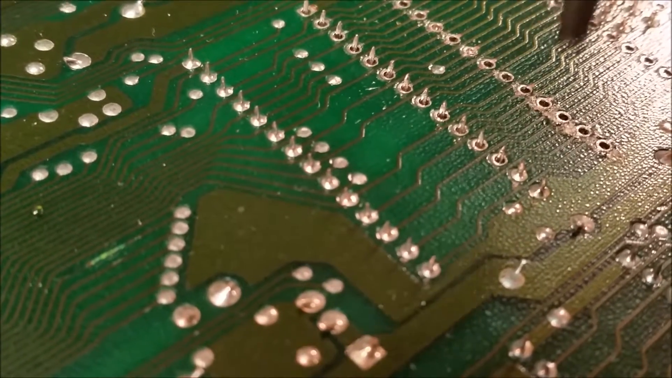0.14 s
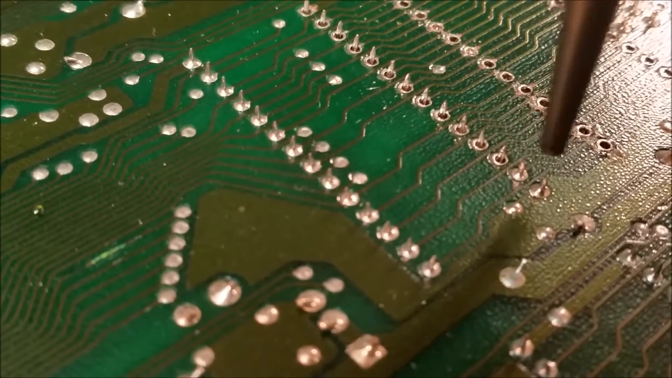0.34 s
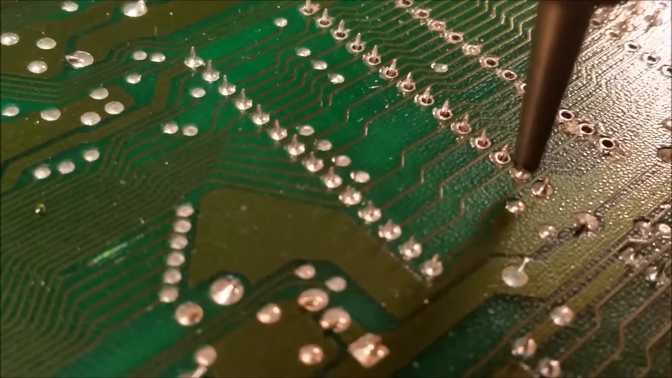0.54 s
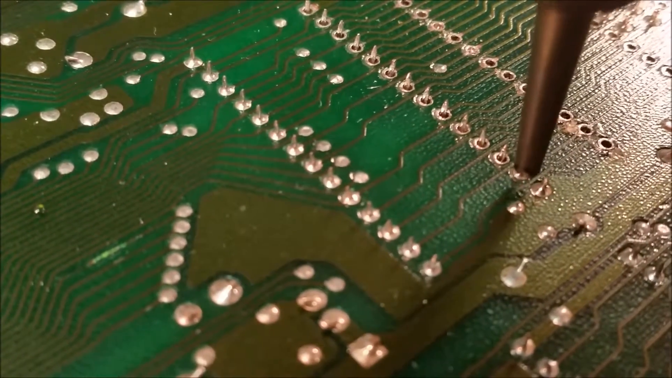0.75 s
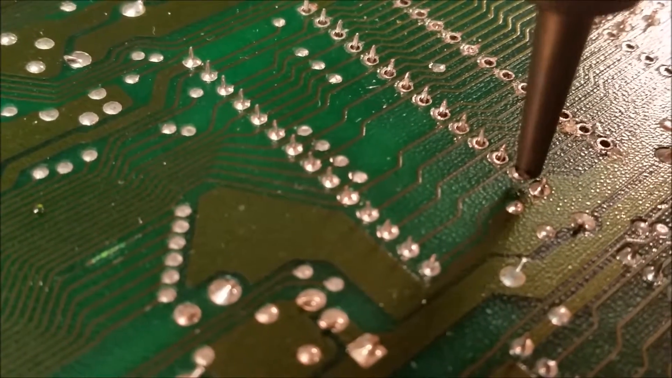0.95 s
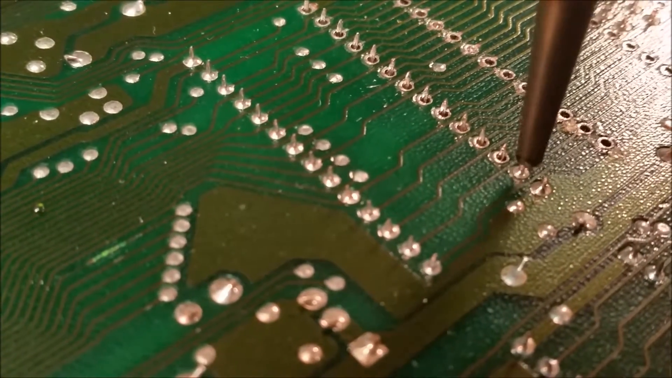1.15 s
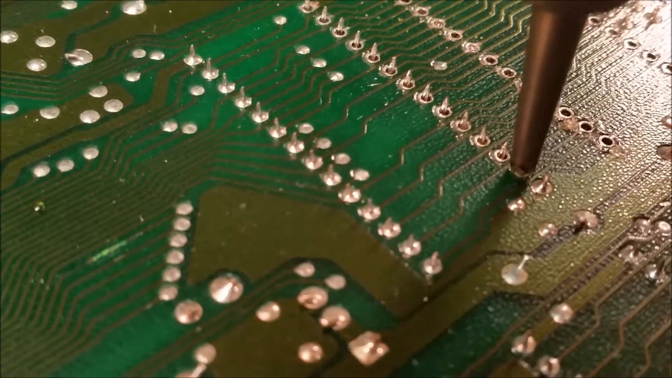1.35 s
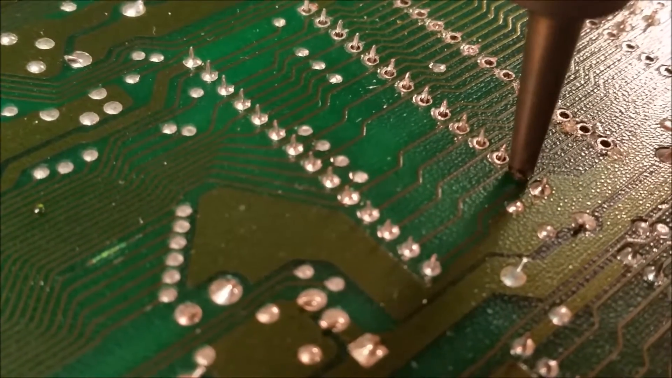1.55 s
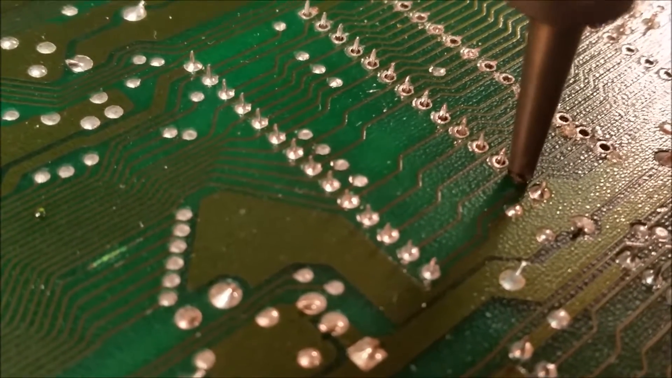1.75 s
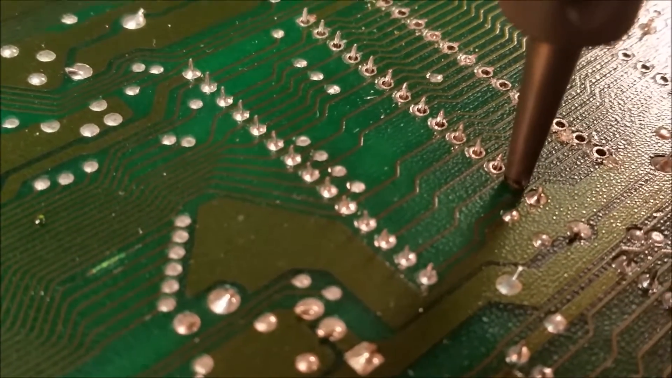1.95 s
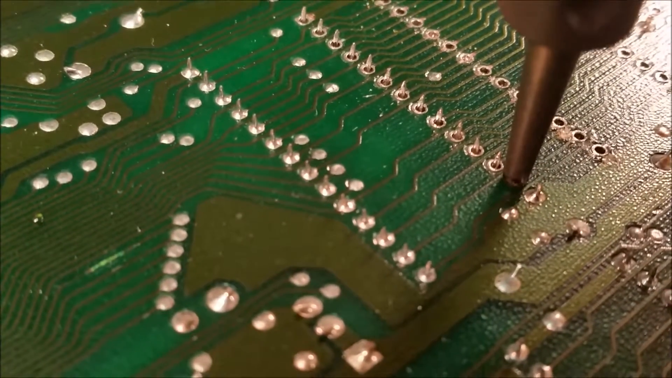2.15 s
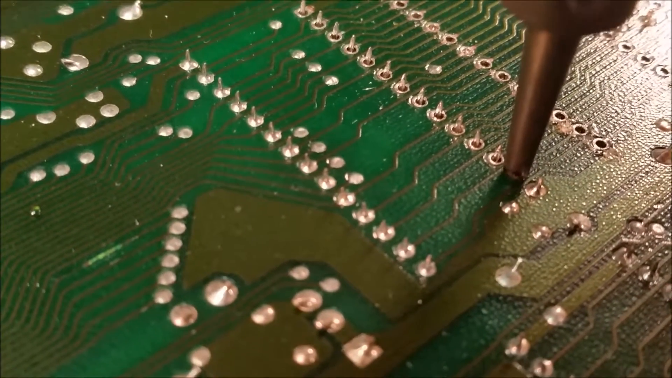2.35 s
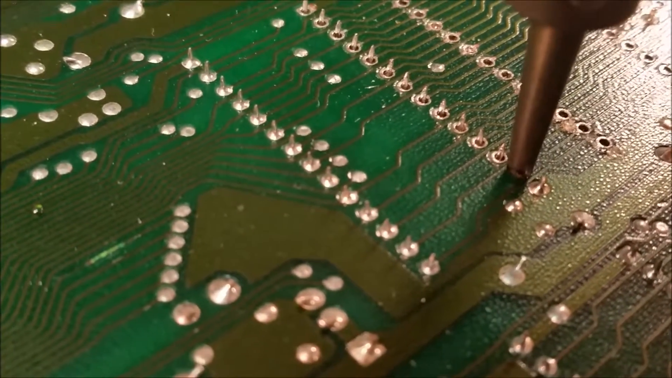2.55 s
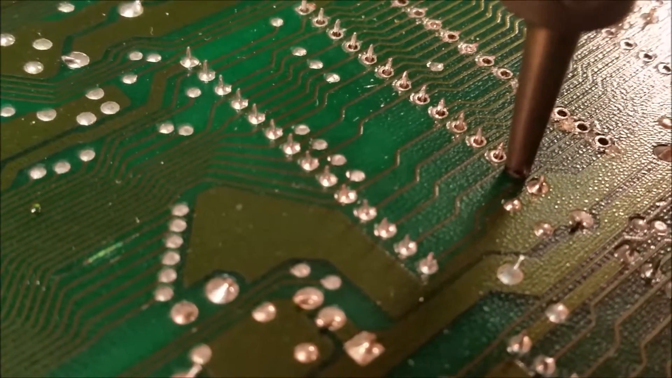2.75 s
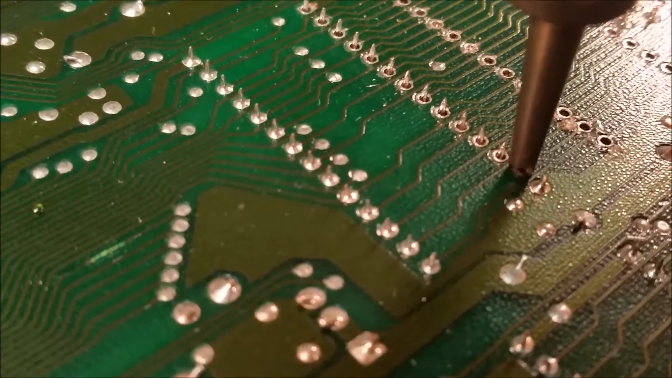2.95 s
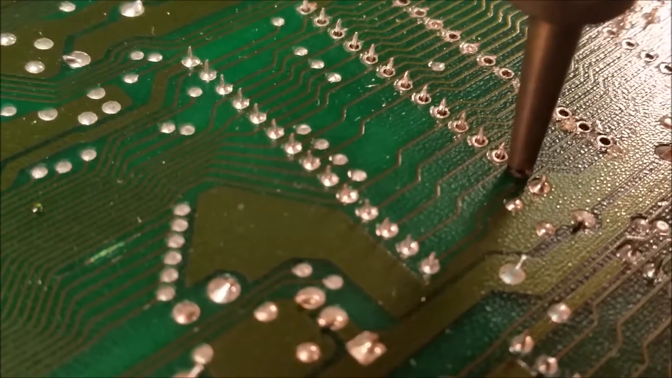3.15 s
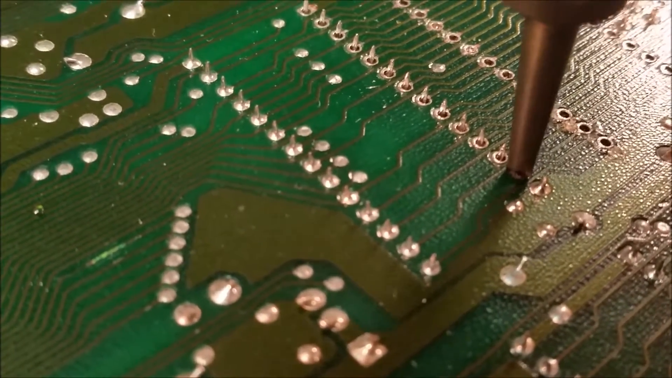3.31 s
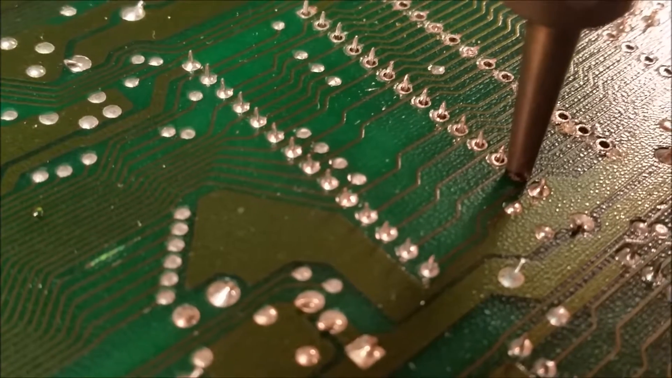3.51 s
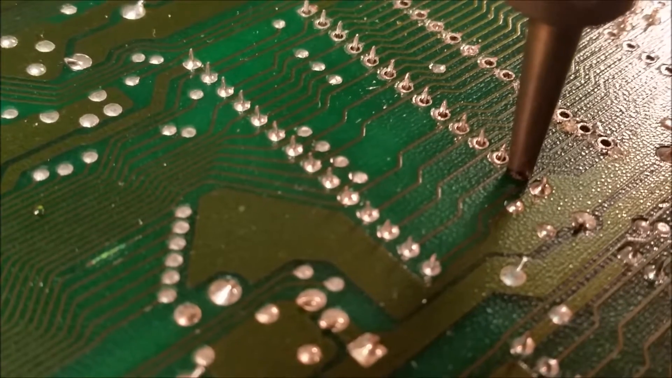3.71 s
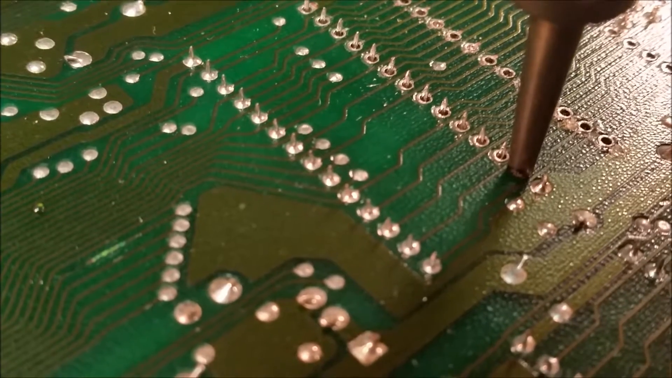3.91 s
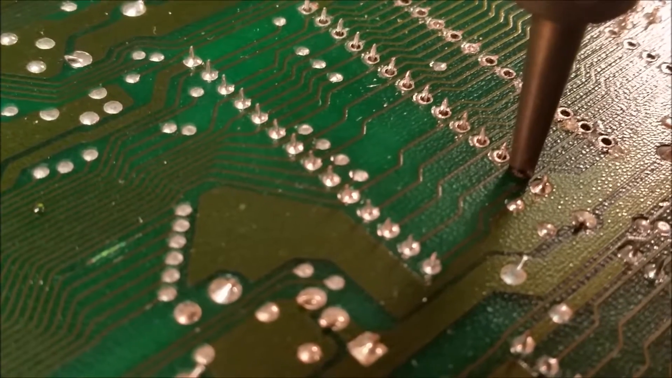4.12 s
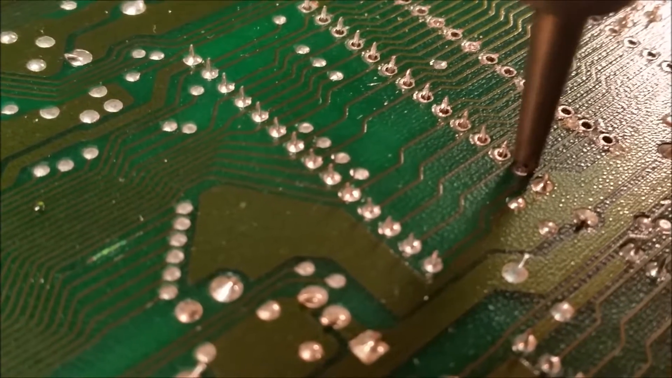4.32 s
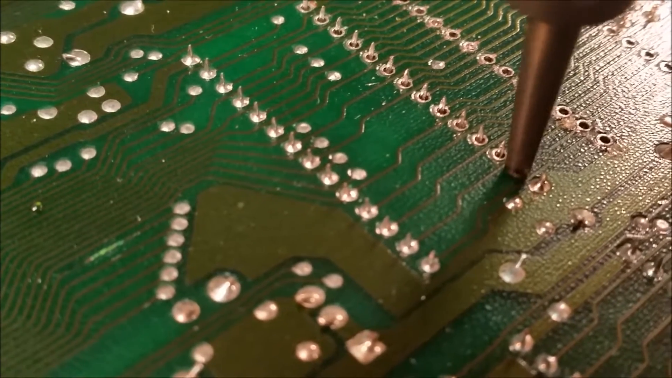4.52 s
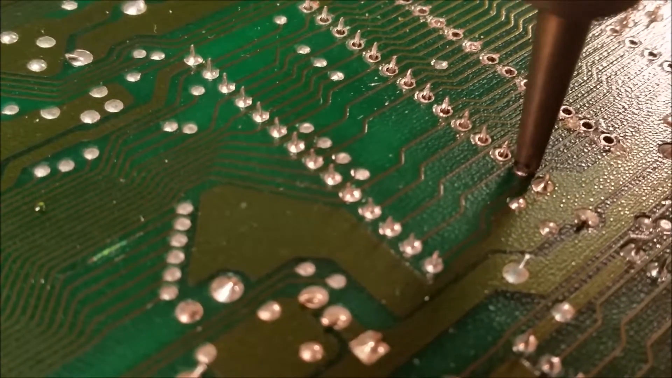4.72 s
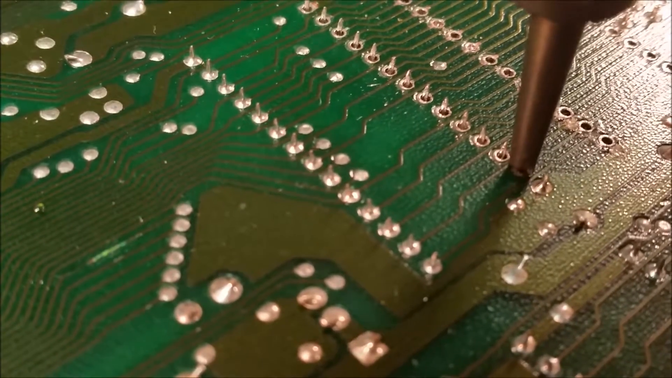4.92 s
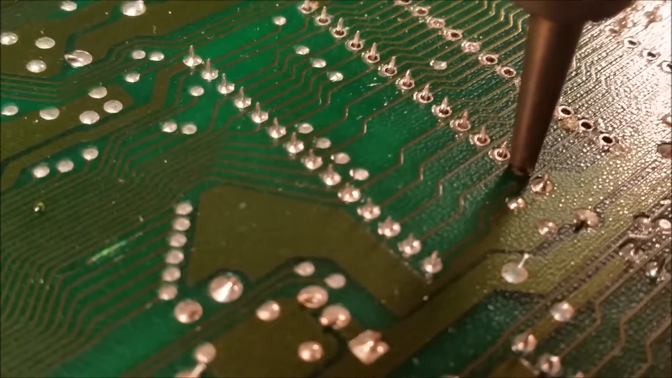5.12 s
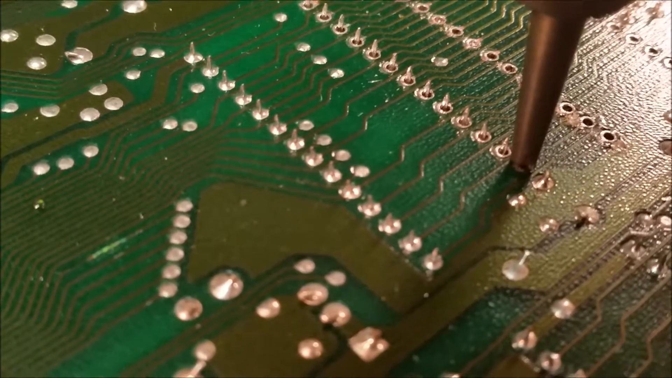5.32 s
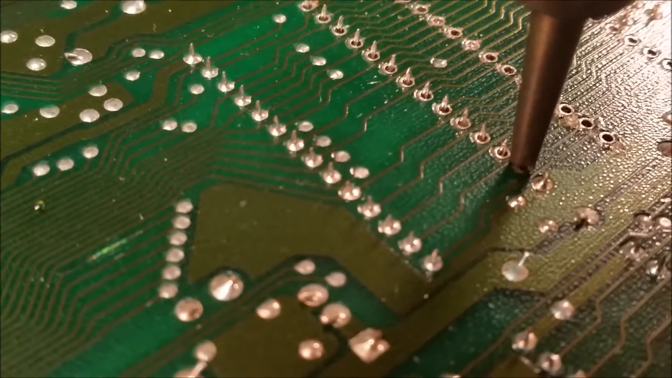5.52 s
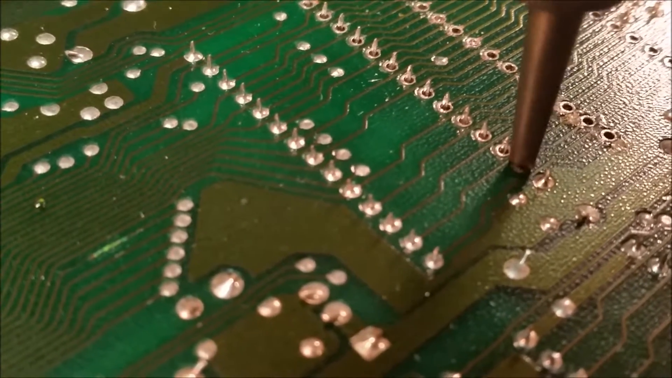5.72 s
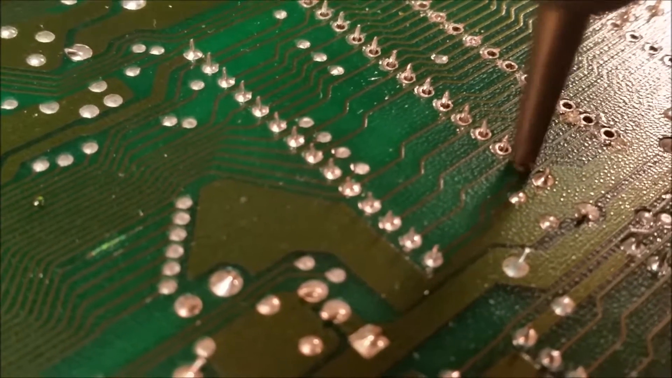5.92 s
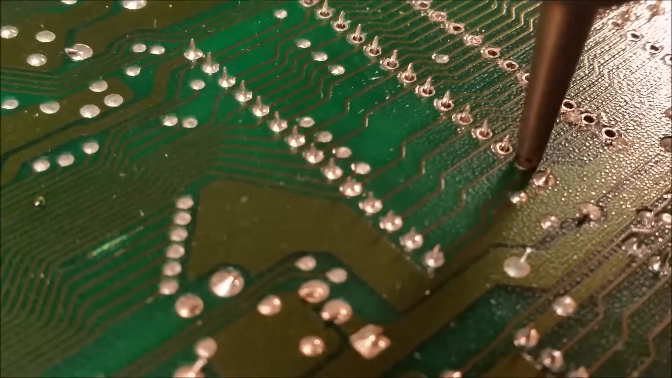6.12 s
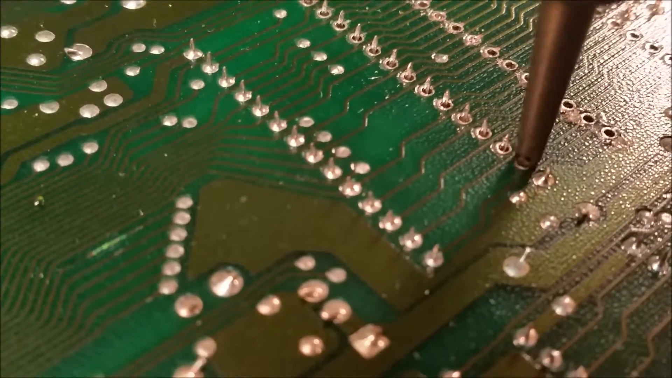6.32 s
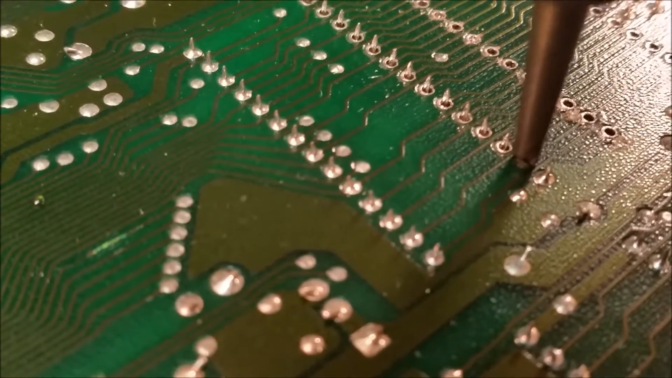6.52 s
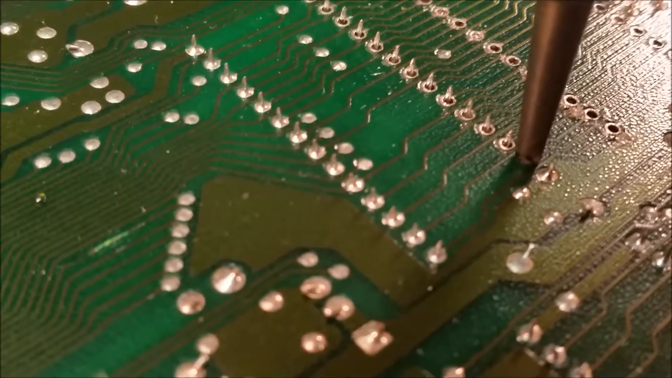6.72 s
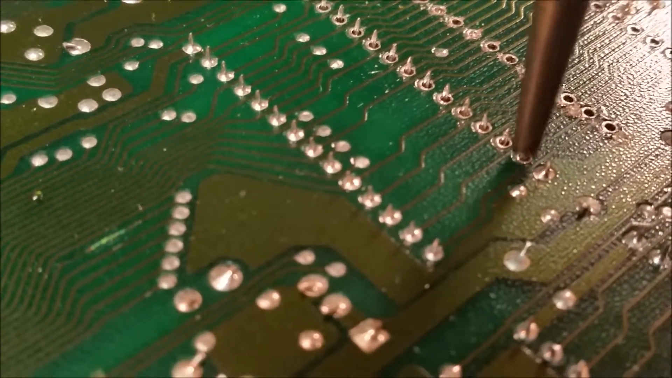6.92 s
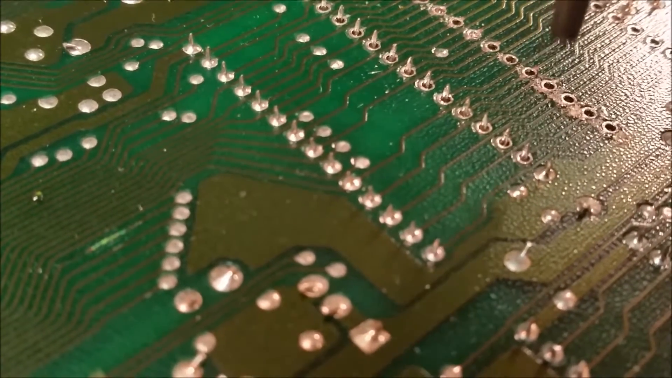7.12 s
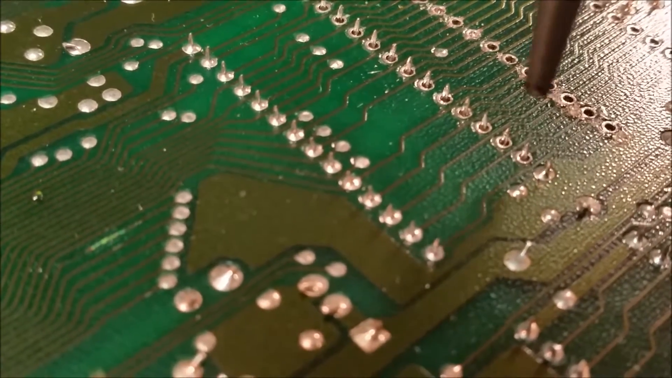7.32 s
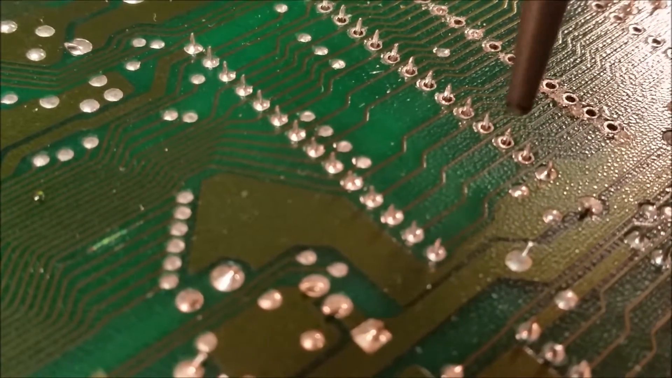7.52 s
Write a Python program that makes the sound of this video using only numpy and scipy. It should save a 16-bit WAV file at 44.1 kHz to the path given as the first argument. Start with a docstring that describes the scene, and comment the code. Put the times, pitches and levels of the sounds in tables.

```python
"""A vacuum desoldering gun works on a circuit board, close by in a humming workshop.
At first its pump and air hiss are running; a click comes and they die away, and the board shifts.
The hot nozzle then taps, chatters and scrapes on a pin, and flux crackles very faintly.
The trigger clicks, the pump starts with a deep throb and drones on; air hisses into the nozzle, spits
solder and whistles, amid more taps; the nozzle clicks off the pin and the pump and hiss die away again."""
import sys
import numpy as np
from scipy import signal
from scipy.fft import rfft, irfft, next_fast_len
from scipy.io import wavfile
from scipy.ndimage import map_coordinates

SR = 44100
rng = np.random.default_rng(int(sys.argv[2]) if len(sys.argv) > 2 else 0)


def persist_wave(psi):
    """Save psi, clipped to +-1, as 16-bit WAV."""
    counts = np.round(np.clip(psi, -1, 1) * 32767).astype(np.int16)
    wavfile.write(sys.argv[1], SR, np.atleast_2d(counts).T)


N = 337629  # length in samples


def amp(db):
    """Turn decibels into a gain."""
    return 10 ** (np.asarray(db) / 20)


def unit(x):
    """Scale a sound to an average (rms) level of 1."""
    return x / np.sqrt(np.mean(x ** 2) + 1e-20)


def along(points, hz):
    """Read a table of (pitch, value) points at any pitch, on a log pitch axis."""
    point_hz, value = np.transpose(points)
    return np.interp(np.log(hz + 1), np.log(point_hz + 1), value)


def curves(rows):
    """Join the table rows by straight lines: one curve for each column after the time."""
    s, *columns = np.transpose(rows)
    return [np.interp(np.arange(N) / SR, s, column) for column in columns]


def wobble(rate):
    """Draw a smooth random curve with rate random points a second."""
    points = rng.standard_normal(int(N * rate / SR) + 4)
    return map_coordinates(points, [np.arange(N) * rate / SR])


def phase_of(hz):
    """Add up a changing pitch into the running phase of its wave."""
    return 2 * np.pi * np.cumsum(hz) / SR


def filtered(x, response):
    """Multiply each pitch in a sound by a gain that depends on the pitch."""
    n = x.shape[-1]
    m = next_fast_len(n + 8192)  # silence at the end gives the filter room to ring
    return irfft(rfft(x, m) * response(np.fft.rfftfreq(m, 1 / SR)), m)[..., :n]


def noise(spectrum, size=N):
    """Colour random noise with a table of levels, then scale it to rms 1."""
    return unit(filtered(rng.standard_normal(size), lambda hz: amp(along(spectrum, hz))))


# how alike left and right are in sound from all round: pitch_hz, likeness (0 to 1)
LIKENESS = [(60, 1), (150, 0.96), (380, 0.98), (950, 0.1), (2380, 0.1), (5980, 0.25), (15000, 0.6)]


def diffuse(spectrum):
    """Make stereo noise from all round, as alike on both sides as the likeness table says."""
    def response(hz):
        turn = np.arccos(np.clip(along(LIKENESS, hz), 0, 1)) / 2
        return amp(along(spectrum, hz)) * [np.cos(turn), np.sin(turn)]

    mid, side = filtered(rng.standard_normal((2, N)), response)
    return unit(np.array([mid + side, mid - side]))


def pan(left_db):
    """Give the two channel gains for a source left_db louder on the left."""
    return amp([[left_db / 2], [-left_db / 2]])


def add(track, s, sound):
    """Mix a sound into the track at time s."""
    start = max(round(s * SR), 0)
    track[:, start:start + sound.shape[-1]] += sound[..., :N - start]


SAG_S = .04  # time constant of the pitch sag


def ring(modes, scatter_db, sag=0, size=8192):
    """Ring struck modes from rest, with new strengths at every blow; their pitch may sag by a share."""
    t = np.arange(size) / SR
    hz, db, t60 = np.transpose(modes)[..., None]
    strength = rng.standard_normal((len(modes), 1))
    phase = hz * phase_of(1 - sag * (1 - np.exp(-t / SAG_S)))
    level = amp(db + scatter_db * strength - 60 * t / t60)
    return np.sum(level * np.sin(phase), axis=0) * (1 - np.exp(-t / 0.001))


def burst(spectrum, t60, shared, size=4096):
    """Imitate dense high modes dying together by fading noise, partly shared by the channels."""
    t = np.arange(size) / SR
    common, left, right = (noise(spectrum, size=size) for _ in range(3))
    stereo = np.sqrt(shared) * common + np.sqrt(1 - shared) * np.array([left, right])
    fade = np.exp(-np.log(1000) * t / t60)  # 60 dB down after t60 seconds
    return stereo * fade * (1 - np.exp(-t / 0.00054))


# fan rumble colour: pitch_hz, relative level_db (per Hz)
FAN_RUMBLE = [(15, -72), (25, -102), (48, -13.5), (85, -10.5), (109, -1.5), (140, -10.5), (271, -4.5),
              (533, -15.5), (557, -21), (637, -29), (900, -29), (1170, -42), (1980, -120)]
# fan hiss colour: pitch_hz, relative level_db (per Hz)
FAN_HISS = [(400, -13), (700, 3.5), (1100, -0.5), (1500, -2.5), (2000, -11), (3100, -20.5), (4200, -15),
            (5600, -24), (7200, -21.5), (9000, -30), (11000, -25), (14000, -28), (15600, -22.5)]
# hum of the bench equipment: pitch_hz, level_db (rms, before its wobble)
BENCH_HUM = [(119, -44.5), (522, -59), (630, -58.5), (1045, -66), (7550, -85)]


def workshop():
    """Fans make wavering rumble and hiss as noise; bench equipment hums as unsteady tones."""
    hum = 0
    for hz, db in BENCH_HUM:
        phase = phase_of(np.full(N, hz)) + 0.54 * wobble(16)
        hum = hum + amp(db + 3.7 * wobble(11)) * np.sin(phase)
    rumble = amp(-38.5 + 0.78 * wobble(12)) * diffuse(FAN_RUMBLE)
    hiss = amp(-54 + wobble(2.71)) * diffuse(FAN_HISS)
    return rumble + hiss + np.sqrt(2) * hum


# when the pump is switched on, the first run before the start of the sound: on_s, off_s
PUMP_RUNS = [(-1, .125), (5.535, 7.172)]


def run_clocks():
    """For each pump run, count the seconds since it was switched on and since it was switched off."""
    on, off = np.transpose(PUMP_RUNS)[..., None]
    t = np.arange(N) / SR
    return np.maximum(t - on, 0), np.maximum(t - off, 0)


SPIN_UP_S, COAST_S = .045, .35  # time constants of gaining and losing speed


def pump_speed():
    """Give the share of full speed: the motor spins up when switched on and coasts down after."""
    since_on, since_off = run_clocks()
    return np.max((1 - np.exp(-since_on / SPIN_UP_S)) * np.exp(-since_off / COAST_S), axis=0)


# tones of the pump: multiple of the shaft's pitch, relative level_db (rms)
PUMP_TONES = [(1, -32), (2, -37.5), (4, -37.5), (5, -51), (6, -40.5), (7, -47), (8, -44.5), (9, -47.5),
              (12, -63.5), (16, -66), (17, -71), (20, -51), (21, -56.5), (24, -61), (26, -66), (28, -64.5)]
# rattle colour of the pump's casing: pitch_hz, relative level_db
CASING_RATTLE = [(30, 12), (60, -2), (120, 4.5), (190, -6.5), (250, 3.5), (380, -10.5), (520, -10),
                 (700, -36), (1200, -62)]
SHAFT_HZ = 65.54  # turns a second at full speed
PUMP_DB, STALL_DB = -1, 108  # gain at full speed, and the gain lost on the way down to standstill


def pump():
    """One stroke per turn of the shaft gives a drone of overtones; the casing rattles along as noise."""
    speed = pump_speed()
    db = PUMP_DB - STALL_DB * (1 - speed)
    shaft = phase_of(SHAFT_HZ * speed * (1 + 0.0017 * wobble(14)))
    drone = 0
    for multiple, level_db in PUMP_TONES:
        tone = np.sin(round(multiple) * shaft + rng.uniform(0, 2 * np.pi))
        drone = drone + amp(level_db + 1.55 * wobble(7)) * tone

    def radiated(hz):
        leaning = pan(left_db=7) ** np.clip(hz / 1200, 0, 1) ** 3  # the whine comes from the left
        return leaning / (1 + (53 / (hz + 1)) ** 12)  # the small casing radiates no deep bass

    return filtered(amp(db) * (np.sqrt(2) * drone + amp(-33.0) * diffuse(CASING_RATTLE)), radiated)


FLOW_DB = -32.5  # gain at full air flow
SPIN_LAG_S, BUILD_S = 0.0066, 0.031  # air starts just behind the pump; time constant of the build-up
LINGER_S, RELEASE_DB_PER_S = 0.034, 260  # the vacuum outlasts the pump, then collapses
SEEP_DB, SEEP_DB_PER_S = -18, 80  # the last air seeps in slowly, relative to full flow
LIFT_S, LIFT_WIDTH_S, LIFT_DB = 7.14, 0.033, 3.5  # more air gets in as the nozzle lifts off the pin


def air_flow():
    """Give the gain of the hiss: the vacuum builds, holds, outlasts the pump briefly and collapses."""
    since_on, since_off = run_clocks()
    build = (1 - np.exp(-np.maximum(since_on - SPIN_LAG_S, 0) / BUILD_S)) ** 2
    collapse = amp(-RELEASE_DB_PER_S * np.maximum(since_off - LINGER_S, 0))
    seep = amp(SEEP_DB - SEEP_DB_PER_S * since_off)
    lift = np.exp(-((np.arange(N) / SR - LIFT_S) / LIFT_WIDTH_S) ** 2)
    return amp(FLOW_DB + LIFT_DB * lift) * np.max(build * np.maximum(collapse, seep), axis=0)


# colour of the air hiss on the left: pitch_hz, relative level_db
HISS_ON_LEFT = [(300, -11), (600, -53), (800, 6), (1000, 4), (1350, 1), (1700, -6.5), (2800, -5),
                (4200, -1), (5400, -4), (6500, 2), (7900, -1), (8800, -0.5), (10700, -2), (15600, 0)]
# colour of the air hiss on the right: pitch_hz, relative level_db
HISS_ON_RIGHT = [(300, 2), (600, 1.5), (1000, -4), (1400, -13), (2400, -7), (4200, -9), (5400, -9.5),
                 (6800, -9.5), (9200, -5.5), (10600, 6), (11500, 0), (12600, -4.5), (14200, 1),
                 (15600, 1.5)]
# resonances of the nozzle in the hiss: pitch_hz, width_hz, gain_db
NOZZLE_RESONANCES = [(1440, 45, 10), (3090, 41, -3), (3376, 19, 12), (4000, 250, 3), (6450, 370, 4.5),
                     (7850, 240, 6.5), (10540, 520, 2), (11450, 290, 5)]


def suction():
    """Turbulent air at the nozzle is fluttering noise, coloured differently on each side."""
    left, right = amp(-0.94) * noise(HISS_ON_LEFT), noise(HISS_ON_RIGHT)
    stereo = np.array([left + 0.046 * right, right + 0.045 * left])

    def resonant(f):
        return amp(sum(db / (1 + (2 * (f - hz) / width) ** 2) for hz, width, db in NOZZLE_RESONANCES))

    flutter_db = 0.34 * wobble(9) + 1.2 * wobble(35) + 1.05 * wobble(400)
    return air_flow() * amp(flutter_db) * filtered(stereo, resonant)


# whistles at the gap round the pin: start_s, length_s, pitch_hz (before bending), level_db (peak, before pan)
GAP_WHISTLES = [(0, 0.085, 13750, -42), (5.62, .15, 15200, -50), (5.923, .11, 14500, -42),
                (6.17, 0.097, 13950, -40), (6.405, 0.096, 14200, -39), (6.65, 0.08, 13700, -40),
                (6.88, 0.21, 14000, -41), (7.111, .09, 13850, -48)]
# air pinched at the pin: start_s, pitch_hz (before wavering), level_db (peak)
PIN_SQUEAKS = [(6.156, 10550, -26), (6.396, 10510, -30), (6.526, 15300, -21), (6.638, 10500, -29.5)]


def whistles():
    """Air at the gap round the pin makes thin tones that arch up and fade, and short squeaks."""
    out = np.zeros((2, N))
    waver = 0.017 * wobble(70) + .012 * wobble(900)
    for s, length, hz, db in GAP_WHISTLES:
        arch = np.sin(np.linspace(0, np.pi, int(length * SR))).clip(0)
        pitch = hz * (1 + 0.0065 * (arch - .7) + waver[int(s * SR):][:len(arch)])
        add(out, s, amp(db) * pan(left_db=19) * np.sqrt(arch) * np.sin(phase_of(pitch)))
    t = np.arange(SR // 16) / SR
    rise = t / 0.0028
    swell = rise * np.exp(1 - rise)
    for s, hz, db in PIN_SQUEAKS:
        pitch = hz * (1 + waver[int(s * SR):][:len(t)])
        add(out, s, amp(db) * swell * np.sin(phase_of(pitch)))
    return out


# clicks of the trigger, and of the nozzle lifting off the pin:
# start_s, ring_db, snap_db, clatter_db, ring_pitch_hz (levels before pan)
GUN_CLICKS = [(0.09, -14.5, -27, -28, 1220), (5.5116, -13.5, -32.5, -36, 1370),
              (7.0888, -21.5, -18.5, -22.5, 1490), (7.1172, -17, -17, -30, 1030),
              (7.1264, -22, -27, -31, 1240), (7.1368, -20, -25, -29, 1260), (7.1928, -25, -26, -21.5, 1340)]
# ringing of the gun's plastic body: multiple of the ring pitch, relative level_db, ring_time_s (60 dB fade)
BODY_MODES = [(.85, -10, 0.029), (1, -1.5, 0.023), (1.62, -3.5, 0.0056), (2.8, -13, 0.0064),
              (3.15, -4.5, 0.0037)]
# clatter colour of the gun's parts: pitch_hz, relative level_db
CLATTER_COLOUR = [(500, -41), (850, -9), (1250, 8), (1800, -2.5), (2200, 0), (2700, -5), (3300, -1.5),
                  (4300, -1.5), (6000, -18)]
# bright colour used for the snap and for solder in the tube: pitch_hz, relative level_db
TUBE_COLOUR = [(700, 6), (1200, 5), (2800, -5), (4000, 5), (5400, -2), (6600, 7.5), (8000, 0), (9500, -5),
               (12000, -2), (15500, 1.5)]


def clicks():
    """A snap rings the gun's plastic body and shakes its parts."""
    out = np.zeros((2, N))
    for s, ring_db, snap_db, clatter_db, hz in GUN_CLICKS:
        body = ring(np.multiply(BODY_MODES, [hz, 1, 1]), scatter_db=0.5)
        add(out, s, amp(ring_db) * pan(left_db=4.5) * body)
        add(out, s, amp(clatter_db) * pan(left_db=19) * burst(CLATTER_COLOUR, t60=0.021, shared=0.37))
        add(out, s, amp(snap_db) * pan(left_db=17.5) * burst(TUBE_COLOUR, t60=0.014, shared=0.5))
    return out


# the board shifts under the hands and jolts when the pump starts: start_s, length_s, level_db
BOARD_BUMPS = [(0.691, 0.16, -30), (1.306, 0.025, -29), (5.55, 0.079, -21.5), (5.721, 0.086, -27.5),
               (6.55, 0.3, -32), (7.22, 0.25, -43.5)]
# dull colour of the bumps: pitch_hz, relative level_db
BENCH_COLOUR = [(50, -23), (110, 6), (170, 6), (230, -4.5), (330, 0.5), (480, -11), (700, -22.5),
                (1500, -29.5), (4000, -52)]


def bumps():
    """The board shudders dully against the bench, as low noise that swells and fades."""
    out = np.zeros((2, N))
    for s, length, db in BOARD_BUMPS:
        swell = np.sqrt(np.hanning(int(length * SR)))
        add(out, s, amp(db) * swell * noise(BENCH_COLOUR)[:len(swell)])
    return out


CHATTER_S, CHATTER_GAP_S = 1.352, .041  # first bounce, and time between bounces
CHATTER_DB, CHATTER_LOSS_DB = -36.5, 1.3  # first knock, and loss from one bounce to the next
CHATTER_HZ = 838  # centre of the randomly varied knock pitch


def chatter(clack_db, tick_db, count):
    """List evenly spaced, fading taps as the nozzle settles over the pin."""
    bounces = []
    for k, chance in enumerate(rng.standard_normal(count)):
        s, db = CHATTER_S + k * CHATTER_GAP_S, CHATTER_DB - k * CHATTER_LOSS_DB
        bounces.append((s, db, clack_db, tick_db, CHATTER_HZ * (1 + .05 * chance)))
    return bounces


# nozzle taps: start_s, knock_db (before pan), clack_db and tick_db (relative to the knock), knock_pitch_hz
NOZZLE_TAPS = [(.886, -40, -9.5, -14, 800), (1.046, -41, -25, -20, 820), (1.172, -39, -19, -18, 880),
               (1.311, -28, -10.5, -12, 886), (1.583, -32.5, -26, -45, 803), (1.962, -31.5, -21, -20, 460),
               (2.184, -34.5, -8, -12, 906), (2.528, -48, -11, -7, 674), (3.183, -27, -2.5, -10, 749),
               (4.165, -30.5, -12, -19, 770), (4.465, -36.5, -10.5, -16.5, 844),
               (4.551, -26.5, -9.5, -7, 778), (4.621, -41.5, -11, -3, 946), (4.634, -45, -5, 1, 796),
               (4.795, -43, -13, -9, 820), (4.864, -29.5, -8.5, -11.5, 782), (4.946, -32, -19, -22, 880),
               (5.993, -26.5, -16, -12, 824), (6.252, -24.5, -14, -2, 814), (6.471, -24, -18, -2.5, 800),
               (6.695, -29.5, -7.5, -14.5, 793), (6.933, -33, -7.5, -16, 760)]
# the board's bending modes: multiple of the knock pitch, relative level_db, ring_time_s (60 dB fade)
BOARD_MODES = [(.82, -11, 0.067), (.94, 8.5, 0.014), (1.06, 0, 0.064), (1.17, -18, 0.033),
               (1.42, -13, 0.021)]
# the board's higher modes: pitch_hz, relative level_db, ring_time_s (60 dB fade)
HIGH_BOARD_MODES = [(1610, -1.5, 0.071), (1800, -3.5, 0.11), (2450, -7, 0.055), (2590, 0, .05)]
# clack colour: pitch_hz, relative level_db
CLACK_COLOUR = [(700, -8), (1100, -16.5), (1350, 5), (1600, 4.5), (1820, 3), (2100, -4.5), (2450, -8),
                (3100, -23), (3950, -11.5), (5500, -31)]
# tick colour: pitch_hz, relative level_db
TICK_COLOUR = [(1800, -18), (3000, 2.5), (4000, 5), (5400, 5), (7000, 6.5), (8200, 9), (9300, -9.5),
               (11000, 3.5), (13000, -28), (15500, 7)]
SAG_SHARE = .4  # the knock's pitch sags by up to this share as the pressure of a tap eases


def taps():
    """The nozzle ticks on the pin and the board knocks, at a pitch set by how it is pressed."""
    out = np.zeros((2, N))
    for s, db, clack_db, tick_db, hz in [*NOZZLE_TAPS, *chatter(clack_db=-15.5, tick_db=-26, count=4)]:
        knock = ring(np.multiply(BOARD_MODES, [hz, 1, 1]), scatter_db=1.5, sag=SAG_SHARE)
        bend = 1 - np.exp(-np.arange(len(knock)) / SR / 0.00045)  # the board takes a moment to flex
        high_ring = ring(HIGH_BOARD_MODES, scatter_db=5) * bend
        add(out, s, amp(db) * pan(left_db=7.5) * knock * bend)
        add(out, s, amp(db + clack_db - 13.5) * pan(left_db=8) * high_ring)
        add(out, s, amp(db + clack_db) * pan(left_db=12.0) * burst(CLACK_COLOUR, t60=0.055, shared=1.0))
        add(out, s, amp(db + tick_db) * pan(left_db=17) * burst(TICK_COLOUR, t60=0.029, shared=0.35))
    return out


# the hot nozzle sits on the joint: from_s, to_s
HEATING_TIME = (1.35, 5.3)
# crackle colour of the flux: pitch_hz, relative level_db
FLUX_COLOUR = [(3000, -25), (6800, -2), (8800, -14), (10700, 0), (13000, -7), (15300, 7)]
FLUX_QUIETEST_DB, FLUX_RANGE_DB = -113.5, 30  # faintest bubble, and how much louder others may be


def flux(count):
    """Tiny bubbles of boiling flux burst at random moments, as very faint puffs of noise."""
    out = np.zeros((2, N))
    start, end = HEATING_TIME
    for when, size in rng.random((count, 2)):
        level = amp(FLUX_QUIETEST_DB + FLUX_RANGE_DB * size)
        add(out, start + when * (end - start), level * burst(FLUX_COLOUR, t60=.025, shared=.4))
    return out


# the nozzle slips over the pin in jerks: start_s, level_db (of the scratch, before pan)
NOZZLE_SLIPS = [(1.989, -38.5), (2.021, -40.5), (2.053, -42), (2.068, -44), (2.083, -45), (2.106, -47),
                (2.127, -43), (2.184, -43.5)]
# ringing of the steel barrel: pitch_hz, relative level_db, ring_time_s (60 dB fade)
BARREL_MODES = [(1205, 0.5, 0.15), (2285, -1, 0.054), (3080, -11, 0.046), (3350, 0, 0.035),
                (3970, -20, .15), (5600, -8, 0.059), (6240, -7, 0.045), (6600, 2.5, 0.041)]
# scratch colour of the pin: pitch_hz, relative level_db
PIN_COLOUR = [(1500, -21), (3000, 3.5), (4800, -3.5), (6800, -18), (9000, -7), (11500, -1), (13000, -10),
              (15000, 2)]
# resonances in the rubbing: pitch_hz, width_hz, relative level_db
RUB_MODES = [(736, 250, -2), (970, 120, 2), (1190, 91, 0.5), (1730, 400, -7.5), (2320, 520, -13),
             (3300, 270, -14), (6800, 1300, -16.5)]
RUB_S, RUB_HOLD_S = 1.988, 0.087  # the rub starts, and the time before it fades
RUB_DB, SMALL_SLIP_DB = -45.5, -56  # rub and finer slips, before pan
RUB_ATTACK_S, RUB_RELEASE_DB_PER_S = 0.0098, 245


def scrape(count):
    """Each jerk over the pin rings the barrel; gritty rubbing and finer slips lie in between."""
    since = np.maximum(np.arange(N) / SR - RUB_S, 0)
    fade_db = RUB_RELEASE_DB_PER_S * np.maximum(since - RUB_HOLD_S, 0)
    rub = (1 - np.exp(-since / RUB_ATTACK_S)) * amp(RUB_DB - fade_db)
    grit = rng.standard_normal((2, N)) * amp(5.7 * wobble(250))

    def resonant(f):
        total = 0
        for k, (hz, width, db) in enumerate(RUB_MODES):
            damping = 1j * f * width
            # neighbouring resonances take opposite signs
            total = total + (-1) ** k * amp(db) * damping / (hz * hz - f * f + damping)
        return total

    out = rub * pan(left_db=16.0) * unit(filtered(grit, resonant))
    small = [(RUB_S + RUB_HOLD_S * when, SMALL_SLIP_DB) for when in rng.random(count)]
    for s, db in [*NOZZLE_SLIPS, *small]:
        add(out, s, amp(db - 12.0) * pan(left_db=22.0) * ring(BARREL_MODES, scatter_db=4.5))
        add(out, s, amp(db) * pan(left_db=4) * burst(PIN_COLOUR, t60=0.074, shared=.3))
    return out


# the pump's starting throb: time_s, pitch_hz, level_db (rms of the boom)
START_THROB = [(5.53, 85.1, -43), (5.556, 89.9, -22), (5.61, 113.4, -10), (5.648, 125.8, -4.5),
               (5.69, 135, -6.5), (5.718, 125.8, -8.5), (5.744, 105, -12.5), (5.772, 120.3, -30),
               (5.85, 118.3, -39)]
# overtones of the throb: multiple of half the pitch, relative level_db
THROB_TONES = [(3, -26.5), (4, -24), (6, -29.5), (8, -35), (10, -46)]


def throb():
    """A nearly pure boom swells and bends in pitch as the pump takes up its load."""
    hz, db = curves(START_THROB)
    t, phase = np.arange(N) / SR, phase_of(hz)
    boom = amp(db) * np.sin(phase)
    overtones = sum(amp(level_db) * np.sin(round(multiple) * phase / 2 + rng.uniform(0, 2 * np.pi))
                    for multiple, level_db in THROB_TONES)
    buzz = amp(0.64 * db - 2.5) * overtones  # the overtones swell less than the boom
    sounding = (t > START_THROB[0][0]) * (t < START_THROB[-1][0])
    return np.sqrt(2) * (boom + buzz) * sounding


# solder drops flying up the tube: start_s, level_db (before pan)
SOLDER_SPITS = [(5.6109, -21), (5.622, -23.5), (5.6285, -25), (5.6466, -20.5), (5.6987, -22.5),
                (5.7054, -21), (5.7127, -21), (5.743, -19), (5.898, -16), (5.903, -23), (5.9432, -23)]


def spits():
    """Drops of molten solder strike the inside of the tube, as short bright bursts of noise."""
    out = np.zeros((2, N))
    for s, db in SOLDER_SPITS:
        add(out, s, amp(db) * pan(left_db=15.5) * burst(TUBE_COLOUR, t60=0.015, shared=0.85))
    return out


# how long the room rings: pitch_hz, ring_time_s (60 dB fade)
ROOM_RING = [(200, 0.73), (720, 0.21), (1500, 0.13), (6000, 0.19), (15000, 0.069)]


def room_tail():
    """Draw one random answer of the room: noise with a ring time set for each pitch."""
    hz, t, z = signal.stft(rng.standard_normal((2, SR // 2)), SR, nperseg=256)
    fade = amp(-60 * t / along(ROOM_RING, hz)[:, None])
    tail = signal.istft(z * fade, SR, nperseg=256)[1]
    return tail / np.linalg.norm(tail[0])


def reverb(x, size=12000):
    """The room's answer is noise, drawn anew for each stretch of size samples."""
    out = np.zeros((2, N))
    mono = x.mean(axis=0)[None]
    for start in range(0, N, size):
        add(out, start / SR, signal.fftconvolve(mono[:, start:start + size], room_tail(), axes=1))
    return out


def scene():
    """Mix the gun close by with the pump, the air and the room; only the contact sounds echo."""
    contacts = clicks() + taps() + flux(count=22) + scrape(count=6) + spits()
    echo = amp(-8.0) * reverb(contacts)
    steady = workshop() + pump() + suction() + whistles()
    return contacts + echo + steady + bumps() + throb()


TOP_HZ = 15850  # nothing is kept from here up


def record(dry):
    """Round off the highest peaks softly, then remove everything above the band limit."""
    rounded = dry / (1 + np.abs(dry / .97) ** 16) ** (1 / 16)
    return filtered(rounded, lambda hz: hz < TOP_HZ)


dry = scene()
out = record(dry)
persist_wave(out)
```